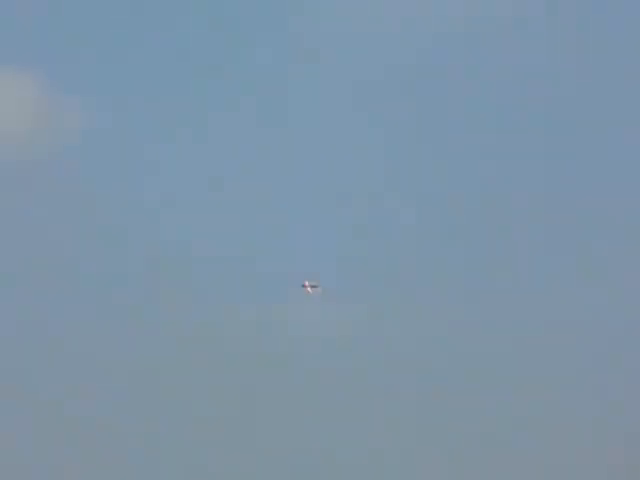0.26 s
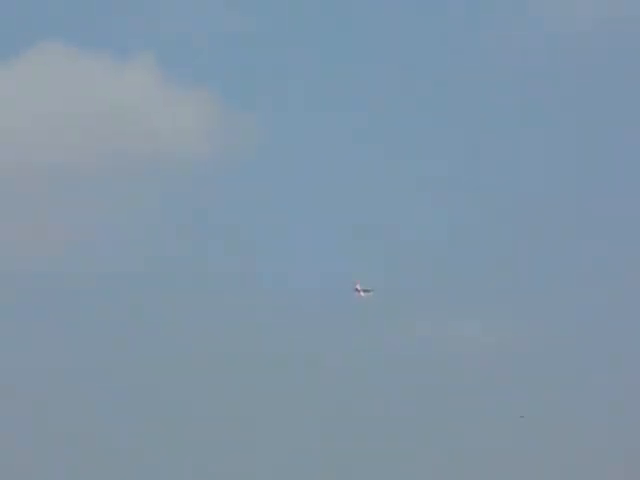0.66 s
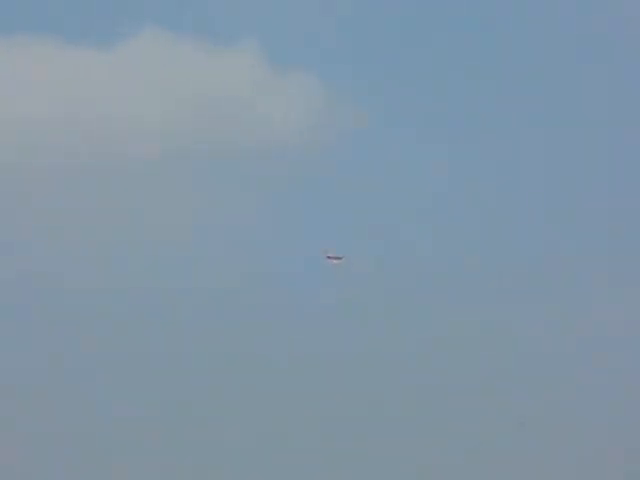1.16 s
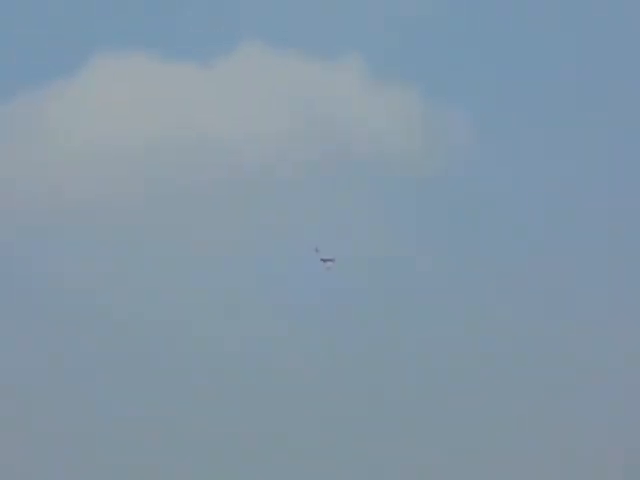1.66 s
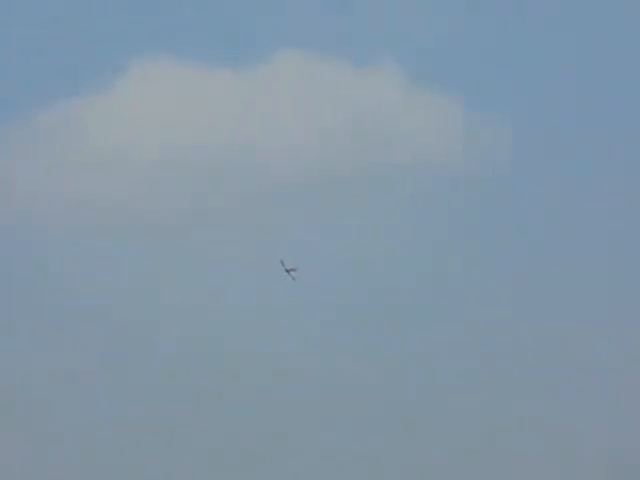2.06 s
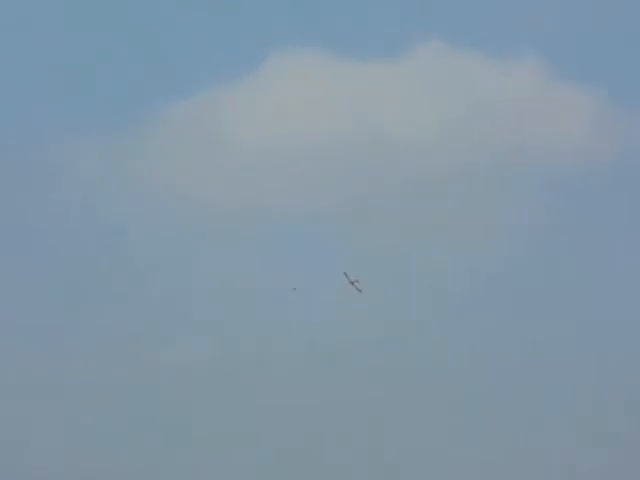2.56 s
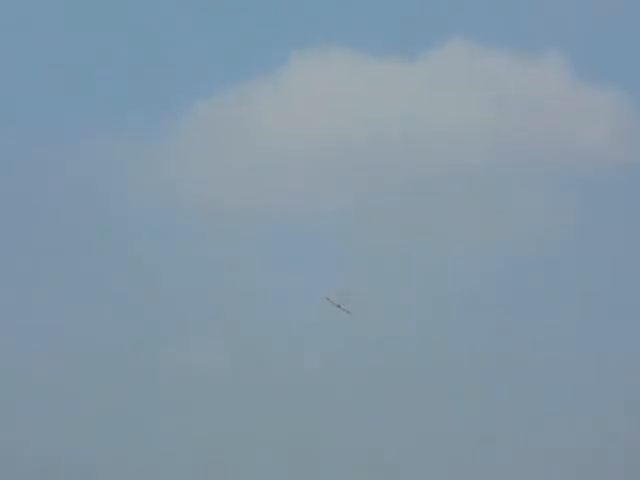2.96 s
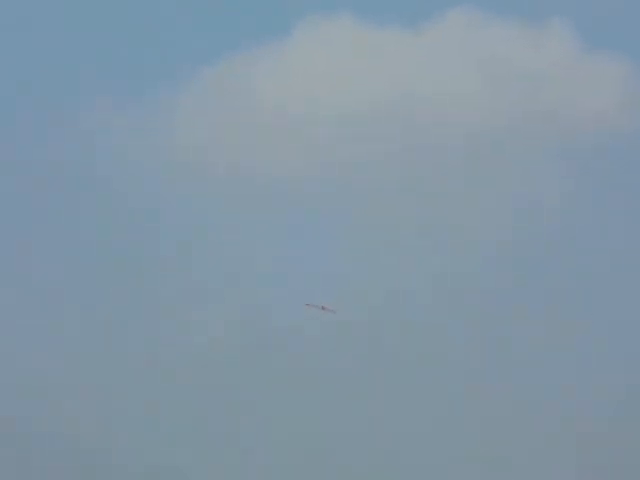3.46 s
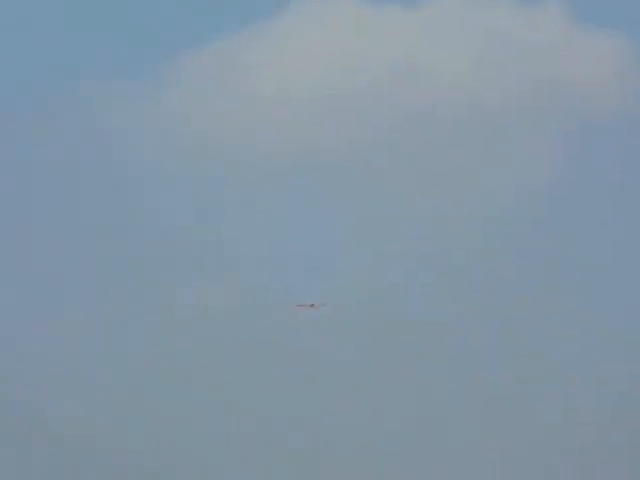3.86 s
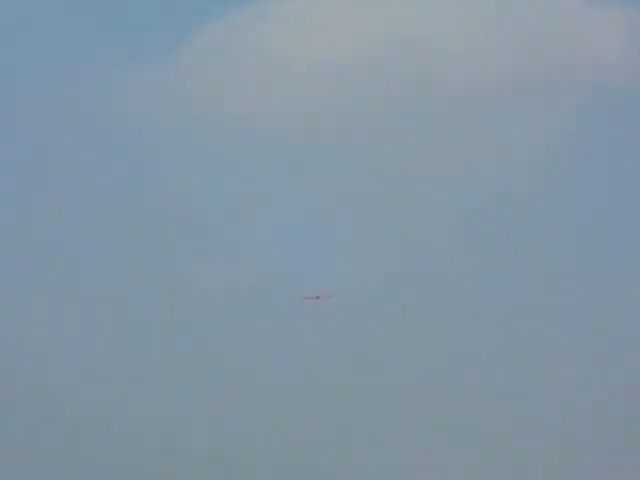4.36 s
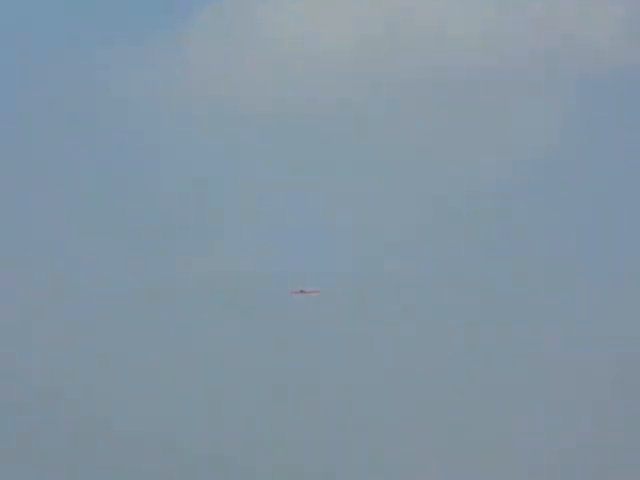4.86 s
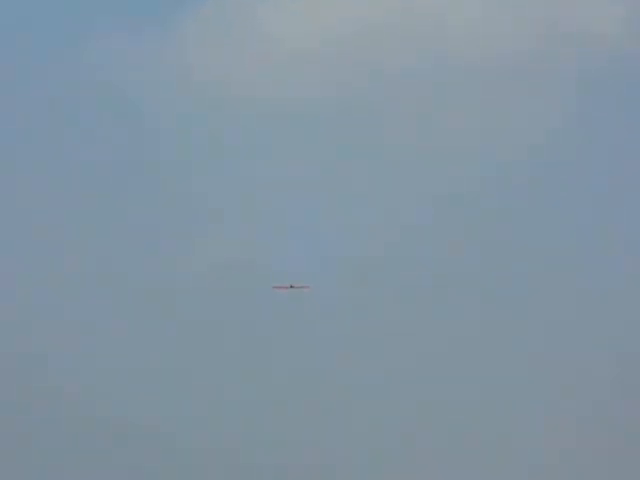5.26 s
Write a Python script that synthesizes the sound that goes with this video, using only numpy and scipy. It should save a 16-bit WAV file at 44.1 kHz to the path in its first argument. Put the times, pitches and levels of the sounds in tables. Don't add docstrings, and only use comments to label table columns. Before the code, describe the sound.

A distant model plane buzzes thinly under wind rumble and a low motor drone while two birds warble and trill; a plastic click snaps near the start.

```python
import sys
import numpy as np
from scipy import signal
from scipy.io import wavfile
from scipy.ndimage import uniform_filter1d, map_coordinates

SR = 44100
rng = np.random.default_rng(int(sys.argv[2]) if len(sys.argv) > 2 else 0)


def dump(signal):
    limited = np.clip(np.atleast_2d(signal).T, -1, 1)
    pcm = np.round(limited * 32767).astype(np.int16)
    wavfile.write(sys.argv[1], SR, pcm)


def field_ratio(decibels):
    return 10 ** (np.asarray(decibels, dtype=float) / 20)


N = 242991


def evened(x):
    return x / np.sqrt(np.mean(x ** 2) + 1e-20)


def drift(size):
    return evened(uniform_filter1d(rng.standard_normal(N), size=size))


def columns(rows):
    s, *values = np.transpose(rows)
    return [np.interp(np.arange(N) / SR, s, v) for v in values]


def add(mix, s, sound):
    part = mix[max(round(s * SR), 0):][:len(sound)]
    part += sound[:len(part)]


def resonate(x, hz, width):
    r = np.exp(-np.pi * width / SR)
    poles = [1, -2 * r * np.cos(2 * np.pi * hz / SR), r * r]
    once = signal.lfilter([1], poles, x)
    return evened(signal.lfilter([1], poles, once))


def plane():
    # t/s, level/dB, heading/0-1 (0 exhaust toward us, .5 propeller edge-on, 1 broadside)
    flight = [(0, -60, .02), (.11, -66, 0.017), (.15, -55.5, 0.022), (.46, -59.5, .06), (.6, -62, 0.16),
              (.85, -60.5, 0.13), (1.25, -55, 0.17), (1.6, -57.5, 0.16), (1.8, -53, 0.98), (2, -48.5, 0.76),
              (2.5, -56.5, 0.95), (3, -65, 0.091), (3.25, -58.5, 0.16), (3.7, -49, 0.67), (4, -55.5, 0.32),
              (4.3, -54, 0.29), (4.8, -56.5, 0.18), (5.51, -58, 0.088)]
    # t/s, f/Hz
    firing = [(0, 112), (.5, 110), (.78, 102), (1.62, 98), (2.25, 92.2), (2.5, 88), (2.95, 85), (3.23, 89),
              (3.4, 89), (3.75, 93.6), (4.3, 92.4), (4.4, 90.5), (4.9, 88.5), (5.1, 85.6), (5.25, 87.6),
              (5.51, 88.2)]
    # main f/Hz, width/Hz, side f/Hz, width/Hz, share of puff noise/0-1
    resonances = [(1690, 170, 1580, 420, .2), (2440, 200, 2820, 320, .3), (4300, 380, 3900, 500, .42),
                  (1870, 240, 1780, 400, .3), (1620, 150, 1540, 260, .2)]
    # heading/0-1, level on axis/dB, loss/dB per heading squared
    beams = [
        (0.13, 2.5, 35),
        (0.88, -3, 80),
        (.55, -0.2, 55),
        (.31, 0.5, 200),
        (.01, 1.5, 300),
    ]
    hz, = columns(firing)
    turns = np.cumsum(hz * (1 + .004 * drift(2000))) / SR
    strength = field_ratio(1.5 * rng.standard_normal(800))[turns.astype(int)]
    kicks = evened(strength * (np.diff(np.floor(turns), prepend=0) > 0))
    puff_shape = np.exp(-(turns % 1) / .22) + .4 * np.exp(-((turns + .5) % 1) / .22)
    puffs = evened(strength * puff_shape * rng.standard_normal(N))
    out = np.zeros(N)
    loud_db, heading = columns(flight)
    for (axis, axis_db, narrow_db), (main_hz, width, side_hz, side_width, share) in zip(beams, resonances):
        db = loud_db + axis_db - narrow_db * (heading - axis) ** 2
        drive = (1 - share) * kicks + share * puffs
        out += field_ratio(db) * (resonate(drive, main_hz, width) + 0.51 * resonate(drive, side_hz, side_width))
    return out


def birds():
    # t/s, length/s, start f/Hz, end f/Hz, level/dB
    far_call = (3.07, .34, 2320, 2310, -60)
    # t/s, level/dB
    far_warble = [(.265, -61), (.325, -61), (.575, -52), (.635, -54), (.695, -65), (1.465, -50),
                  (1.525, -55), (1.61, -57), (1.715, -57), (1.8, -59), (1.86, -53.5), (1.9, -50),
                  (2.2, -50.5), (2.265, -50), (3.3, -67), (3.38, -58), (4.5, -60), (4.61, -66), (4.67, -56),
                  (4.75, -59), (4.93, -55), (5.19, -54), (5.3, -57), (5.44, -58)]
    out = np.zeros(N)
    far_notes = [(s, .032, 3850, 3450, db) for s, db in far_warble]
    for s, length, start_hz, end_hz, db in warble() + [far_call] + far_notes:
        add(out, s, field_ratio(db + 1.27) * whistle(length, start_hz, end_hz, bend=1.85, soft=0.64))
    for s, hz, fall_hz, db in trill():
        note = whistle(.0105, hz + 0.6 * fall_hz, hz - 0.38 * fall_hz, bend=0.71, soft=0.32)
        add(out, s - .005, field_ratio(db + 5.5) * note)
    t = np.arange(6000) / SR
    sparse = rng.standard_normal(6000) * (rng.random(6000) < .05)
    echoes = sparse * field_ratio(-60 * t / .15) * (t > .003)
    return out + field_ratio(-8.5) * signal.oaconvolve(out, echoes / np.linalg.norm(echoes))[:N]


def warble():
    # t/s, length/s, top f/Hz, level/dB
    falling_notes = [(.012, .035, 3900, -48), (.069, 0.051, 3780, -49), (0.13, 0.053, 3770, -51),
                     (0.19, .04, 3830, -51), (.386, .032, 3790, -56), (.448, .03, 3740, -51.5),
                     (.74, .026, 3730, -49.5), (0.81, 0.031, 4010, -49), (0.864, 0.061, 3850, -54),
                     (.942, 0.044, 3990, -49), (1.01, 0.048, 4080, -45.5), (1.077, 0.052, 4120, -44.5),
                     (1.147, 0.055, 4100, -43.5), (1.226, 0.036, 4100, -43.5), (1.278, .041, 3900, -46),
                     (1.29, .045, 4200, -45.5), (1.366, .03, 3800, -44), (1.355, .04, 4150, -44),
                     (1.42, .035, 3820, -45), (1.491, 0.049, 3940, -46), (1.562, 0.047, 3870, -48),
                     (1.659, .019, 3800, -49), (1.762, 0.034, 3920, -50.5),
                     (2.234, 0.043, 3580, -48.5), (2.29, 0.032, 3960, -46.5), (2.32, .04, 3680, -41.5),
                (2.323, 0.039, 4100, -48), (2.37, 0.024, 4040, -38), (2.386, 0.012, 4130, -45),
                (2.401, .029, 3700, -35.5), (2.435, 0.0297, 4130, -35.5), (2.448, 0.0266, 3860, -46),
                (2.467, 0.036, 3750, -35), (2.487, 0.0418, 3960, -35), (2.537, 0.029, 3780, -33),
                (2.556, 0.037, 3905, -34.5), (2.603, 0.038, 3750, -36.5), (2.613, 0.038, 4020, -33.5),
                (2.673, 0.0346, 3820, -33.5), (2.741, 0.029, 3720, -34), (2.8, 0.016, 3900, -45),
                (2.845, 0.026, 3560, -41), (2.888, 0.02, 3560, -38.5), (3.01, 0.021, 3540, -43.5),
                (3.051, .026, 3530, -39.5), (3.18, .031, 3480, -42.5),
                     (4.351, .029, 4100, -46), (4.406, 0.036, 4120, -41), (4.468, 0.032, 4120, -39.5),
                (4.525, .034, 4080, -42.5), (4.583, 0.033, 4020, -41), (4.634, 0.049, 3930, -43.5),
                (4.694, 0.038, 4030, -42.5), (4.73, 0.03, 3830, -52), (4.799, 0.023, 3790, -46.5),
                (4.826, 0.031, 3960, -46.5), (4.875, .016, 3840, -43), (4.89, 0.043, 4010, -48.5),
                (4.953, 0.041, 4080, -43.5), (5.029, .038, 4020, -42.5), (5.098, 0.036, 4060, -42.5),
                (5.157, 0.0477, 4090, -44), (5.21, 0.029, 3850, -51), (5.229, 0.041, 4060, -44),
                (5.277, 0.024, 3870, -47), (5.333, 0.04, 3920, -48), (5.378, 0.023, 3920, -48),
                (5.415, 0.028, 3770, -46), (5.475, 0.04, 3890, -46.5)]
    low_hz, low_follows, fastest_hz_per_s = 3300, 0.17, 26000
    rows = []
    for s, length, top_hz, db in falling_notes:
        bottom_hz = low_hz + low_follows * (top_hz - 3800)
        rows.append((s, length, top_hz, max(top_hz - fastest_hz_per_s * length, bottom_hz), db))
    return rows


def trill():
    # first note t/s, last note t/s, level/dB, fall/Hz
    bursts = [(0.809, .834, -56, 347), (0.896, .911, -52, 1090), (0.934, 0.96, -52, 300),
              (1.008, 1.057, -51.5, 1050), (1.07, 1.103, -51.5, 250), (1.152, 1.204, -50, 1100),
              (1.22, 1.23, -51, 350), (1.3, 1.354, -49.5, 1040), (1.365, 1.376, -57, 352),
              (1.452, 1.496, -49.5, 1100), (2.347, 2.388, -51.5, 1000), (2.474, 2.517, -50, 900),
              (2.63, 2.664, -49, 700), (2.75, 2.806, -51, 800), (2.888, 2.91, -50, 350),
              (2.926, 2.957, -49, 1000), (3.033, 3.07, -54, 500), (3.975, 3.991, -51, 990),
              (4.088, 4.134, -50, 1050), (4.182, 4.194, -54, 198), (4.238, 4.281, -50, 1080),
              (4.297, 4.324, -54, 300), (4.385, 4.43, -49, 1100), (4.451, 4.463, -53, 350),
              (4.555, 4.604, -58, 250), (4.701, 4.737, -55, 304), (5.245, 5.273, -53.5, 950),
              (5.369, 5.414, -51.5, 1100)]
    gap_s, middle_hz, swell_db = .0152, 4970, 1.5
    rows, chance = [], rng.standard_normal((len(bursts), 12, 3))
    for (first, last, db, fall_hz), luck in zip(bursts, chance):
        count = round((last - first) / gap_s) + 1
        for k, s in enumerate(np.linspace(first, last, count)):
            arch_db = swell_db * (np.sin(np.pi * (s - first + .01) / (last - first + .02)) - .6)
            note_fall_hz = abs(fall_hz + 180 * luck[k, 0])
            rows.append((s, middle_hz + 50 * luck[k, 1], note_fall_hz, db + arch_db + 0.61 * luck[k, 2]))
    return rows


def whistle(length, start_hz, end_hz, bend, soft):
    u = np.linspace(0, 1, max(int(length * SR), 8))
    hz = start_hz + (end_hz - start_hz) * u ** bend
    return np.sqrt(2) * np.sin(np.pi * u) ** soft * np.sin(2 * np.pi * np.cumsum(hz) / SR)


def button():
    snap_s = [.5142, .5283, .5095, .5435, .548, .59, .5075, .5335, .530, .601]
    # level/dB, pitch/factor
    snaps = [(-14.5, 1), (-16.5, .98), (-28, 3.6), (-29, .95), (-34, 3.6), (-40, 1.03), (-28, .75),
             (-25, 1.08), (-25, 1.86), (-42, 1.05)]
    # f/Hz, level/dB, t60/s
    shell = [(1240, 4.5, .016), (1310, -8, .085), (1518, -12, .018), (2270, -9, .014), (1050, -11, .09),
             (3260, -15, .01)]
    out, t = np.zeros(N), np.arange(5000) / SR
    for s, (db, pitch) in zip(snap_s, snaps):
        ring = sum(field_ratio(g - 60 * t / t60) * np.sin(2 * np.pi * hz * pitch * t) for hz, g, t60 in shell)
        rattle = field_ratio(-12.5 - 60 * t / .05) * rng.standard_normal(5000)
        add(out, s, field_ratio(db) * (.6 * ring + rattle) * np.minimum(t / .0008, 1))
    return out


def drone():
    # t/s, level/dB
    swells = [(0, -46), (.5, -34.5), (.95, -36), (1.18, -35), (1.5, -39), (1.73, -29), (2.25, -31),
              (2.79, -44.5), (3.08, -29.5), (3.67, -28), (3.85, -47), (4.1, -42), (4.2, -34), (4.37, -24.5),
              (4.6, -32), (4.83, -26.5), (5.16, -42), (5.51, -37.5)]
    base_hz, lift_hz_per_s, waver_hz = 81.6, 0.4096, 0.34
    db, = columns(swells)
    waver = drift(2500)
    hz = base_hz + lift_hz_per_s * np.arange(N) / SR + waver_hz * waver
    return np.sqrt(2) * field_ratio(db + 0.19 * waver) * np.sin(2 * np.pi * np.cumsum(hz) / SR)


def wind():
    # t/s, level/dB
    breeze = [(0, -32), (.3, -33), (.5, -31.5), (.75, -29), (1.02, -28), (1.63, -31.5), (2.19, -34),
              (2.48, -34), (3.03, -32.5), (3.36, -34), (3.8, -31), (4.33, -32.5), (4.78, -34), (5.51, -37)]
    # f/Hz, level/dB per Hz
    buffet_colour = [(12, -31), (25, -19), (45, -5.5), (70, -10.5), (100, -4.5), (125, -5), (150, 1),
                     (168, 4), (190, 0), (225, -3.5), (260, -11), (300, -16), (400, -43)]
    roar_colour = [(280, -43.5), (330, -1), (400, 2.5), (480, -1.5), (560, -25.5), (700, -24)]
    wash_colour = [(250, -27.5), (330, -4), (600, 1), (800, -3), (1050, -3), (1400, -8.5), (2000, -13),
                   (2500, -14.5), (3200, -14.5), (4000, -12.5), (4700, -17), (5500, -15.5), (6000, -56.5)]
    # from t/s, to t/s, boost/dB
    port_open = [
        (0.16, .4, 6.5),
        (.78, 2.346, 8.5),
        (4.1, 4.704, 5.5),
        (5.033, 5.596, 7),
    ]
    calm_db, port_turn_s = -34, 0.13
    breeze_db, = columns(breeze)
    t = np.arange(N) / SR
    port_db = np.zeros(N)
    for a, b, db in port_open:
        port_db += db / 2 * (np.tanh((t - a) / port_turn_s) - np.tanh((t - b) / port_turn_s))
    roar_db = -45 + 0.58 * (breeze_db - calm_db) + port_db
    wash_db = -44.5 + .15 * (breeze_db - calm_db)
    buffet = field_ratio(breeze_db + 4.0) * rush(buffet_colour, patchy_db=0.5, gust_db=0.44)
    roar = field_ratio(roar_db) * rush(roar_colour, patchy_db=0.5, gust_db=0.05)
    wash = field_ratio(wash_db + 2.5) * rush(wash_colour, patchy_db=0.72, gust_db=0.2)
    return buffet + roar + wash


def rush(shape, patchy_db, gust_db):
    frames, hz = N // 512 + 5, np.fft.rfftfreq(2048, 1 / SR)
    a, b, patches = rng.standard_normal((frames, len(hz), 3)).T
    patches = uniform_filter1d(patches, size=9, axis=0)
    patches = evened(uniform_filter1d(patches, size=10, axis=1))
    gusts = evened(uniform_filter1d(rng.standard_normal(frames), size=3))
    f, db = np.transpose(shape)
    colour_db = np.interp(np.log(hz + 1), np.log(f + 1), db, left=-90, right=-90)
    z = (a + 1j * b) * field_ratio(colour_db[:, None] + patchy_db * patches + gust_db * gusts)
    return evened(signal.istft(z, nperseg=2048, noverlap=1536)[1][:N])


def scene():
    # t/s, level/dB, recovery/s
    duck = (.516, -11.5, 0.34)
    # level/dB, time constant/s
    opening = (-14, 0.17)
    s, db, recovery = duck
    t = np.arange(N) / SR
    duck_db = db * np.clip((t - s) / 0.0072, 0, 1) * np.exp(-(t - s) / recovery)
    gain = field_ratio(duck_db + opening[0] * np.exp(-t / opening[1]))
    return ((plane() + birds() + drone() + wind()) * gain + button())[None]


def starve(x, floor_db, tilt_db):
    blocks = dict(window=("kaiser", 7), nperseg=4096, noverlap=2048)
    hz, t, z = signal.stft(x, SR, **blocks)
    level_db = 10 * np.log10(uniform_filter1d(abs(z) ** 2, size=3, axis=0) + 1e-20)
    short_db = 15 * rng.random(len(t)) ** 1.3
    need_db = floor_db + tilt_db * np.tanh((hz[:, None] - 7600) / 900) + short_db
    kept = (level_db > need_db) | (hz[:, None] < 4500)
    return signal.istft(z * kept, SR, **blocks)[1][:N]


def band_limit(x):
    return signal.sosfilt(signal.butter(12, 9970, fs=SR, output="sos"), x)


def record(dry):
    sample_hz = 11024
    t = np.arange(N) / SR
    smooth = signal.oaconvolve(dry[0], signal.firwin(201, 5700, fs=SR), "same")
    at = np.arange(int(N * sample_hz / SR) + 2) / sample_hz
    samples = map_coordinates(smooth, [at * SR], order=3)
    joined = np.interp(t, at, samples) - .0019
    thinned = starve(joined, floor_db=-106, tilt_db=5.5)
    return band_limit(thinned[None])


dry = scene()
out = record(dry)
dump(out)
```